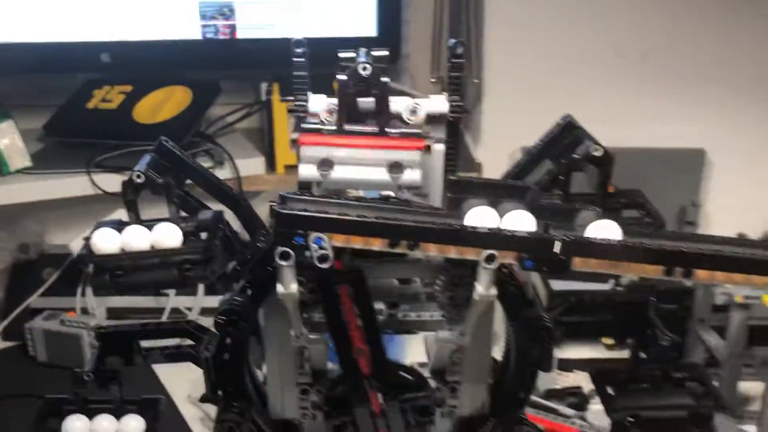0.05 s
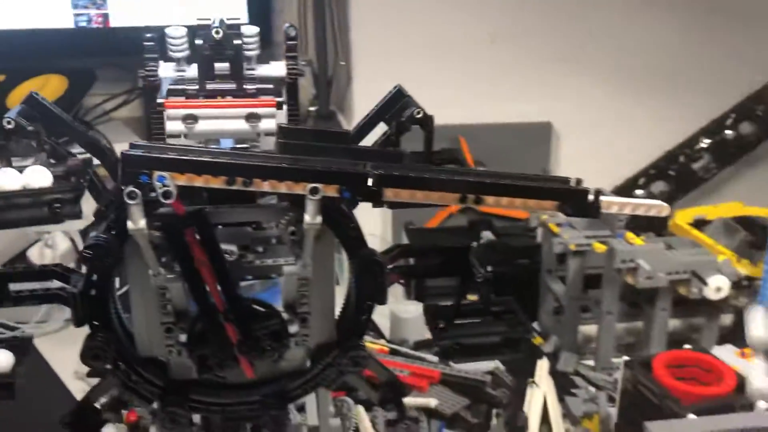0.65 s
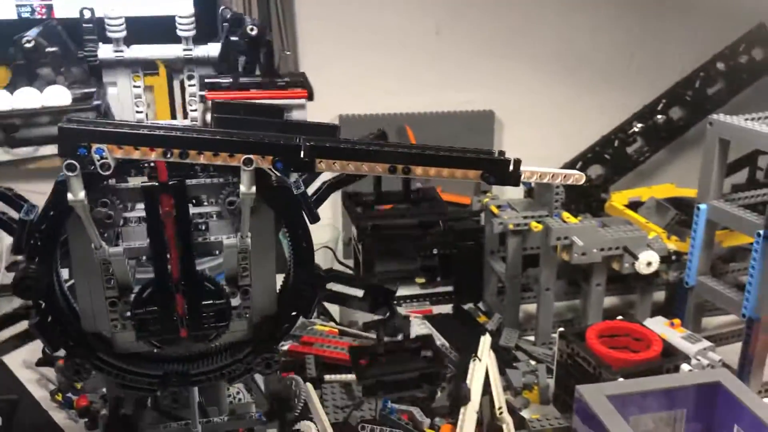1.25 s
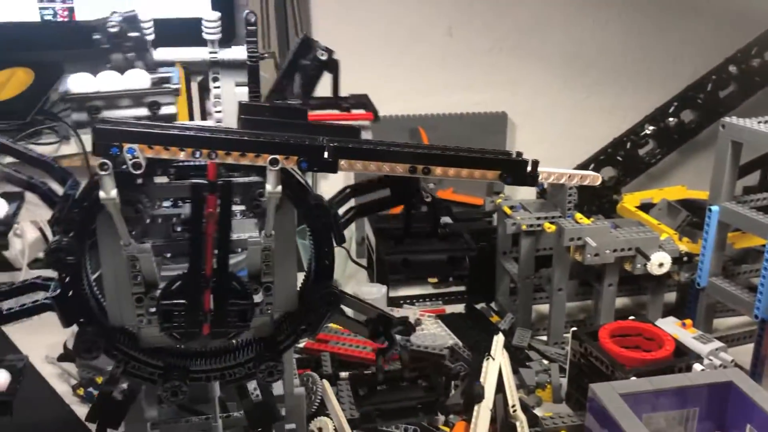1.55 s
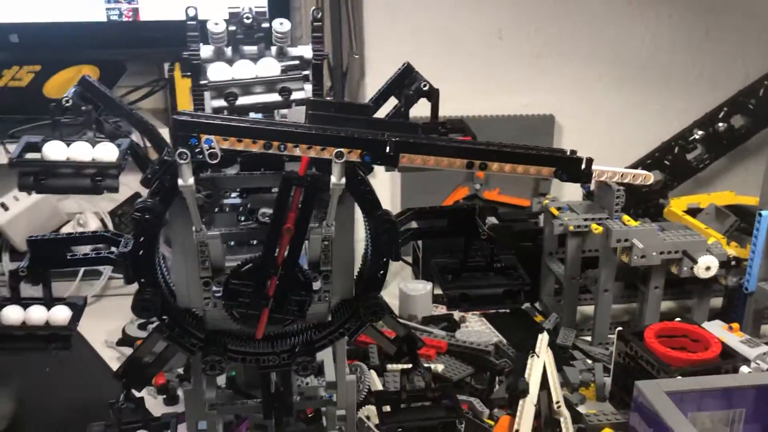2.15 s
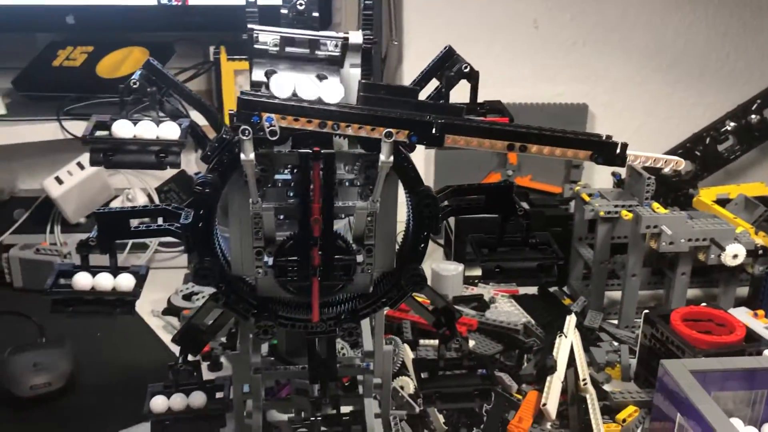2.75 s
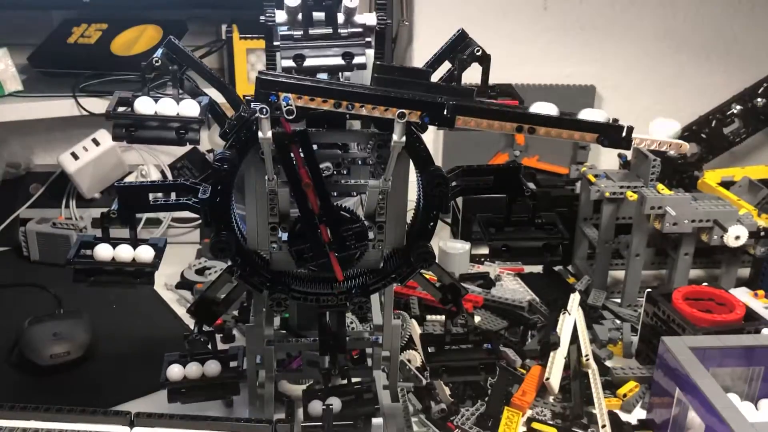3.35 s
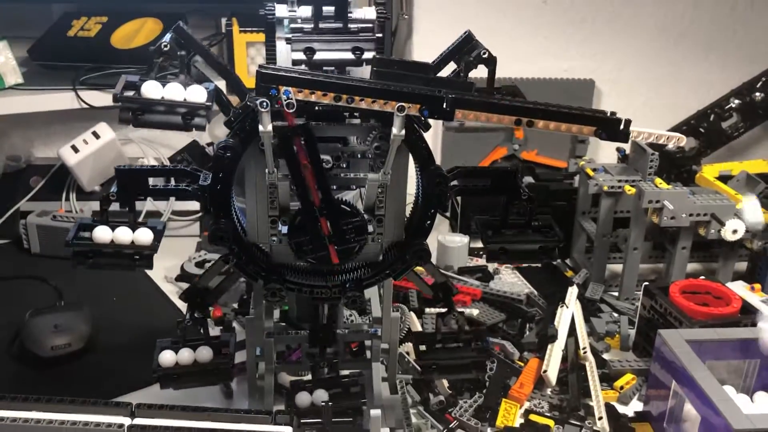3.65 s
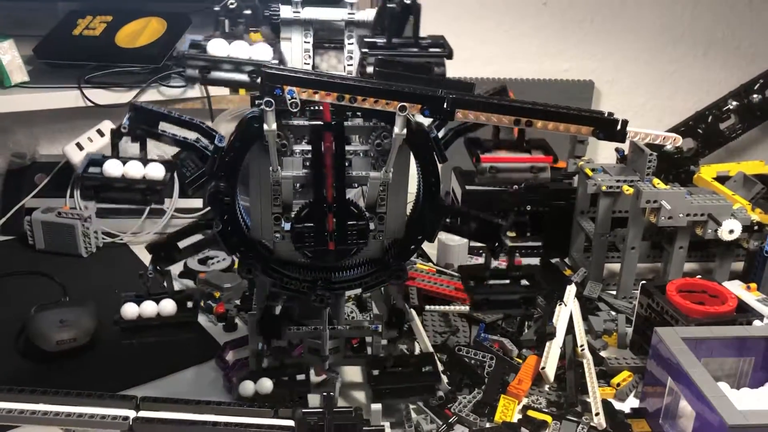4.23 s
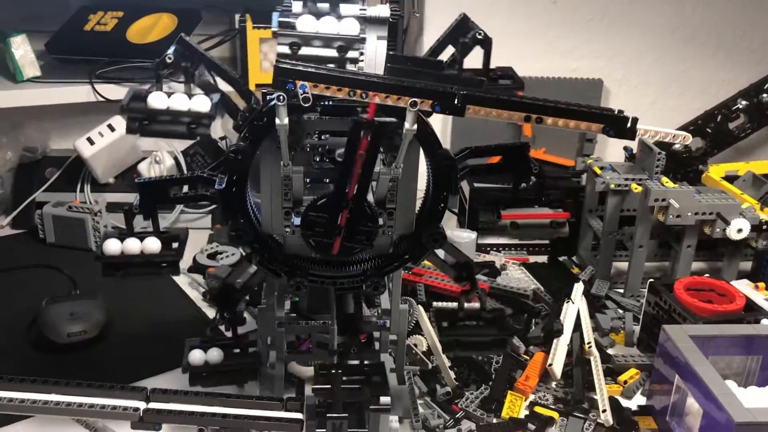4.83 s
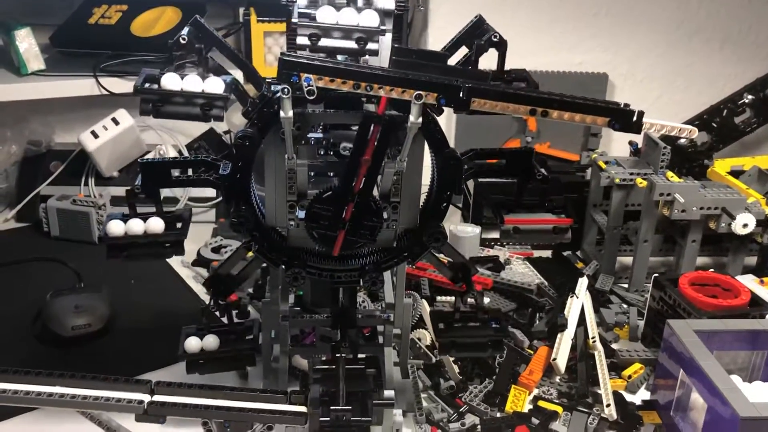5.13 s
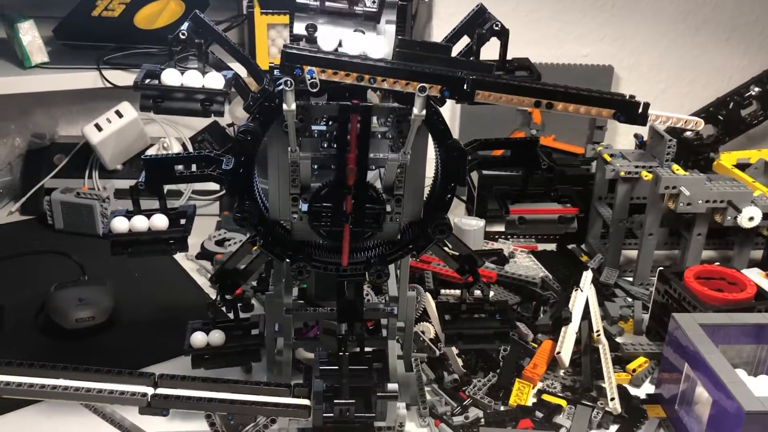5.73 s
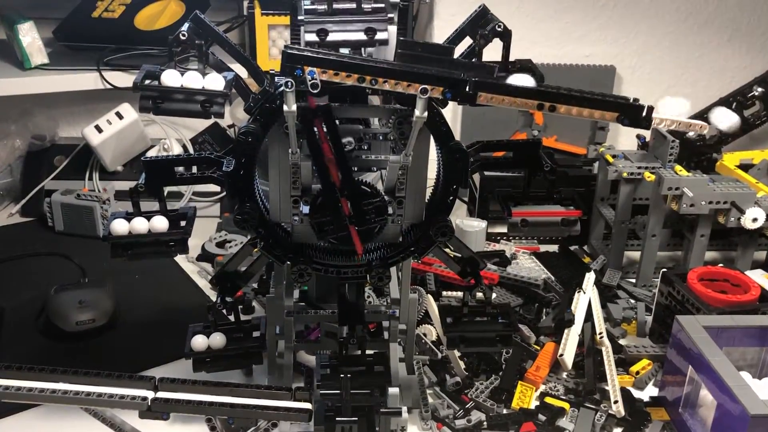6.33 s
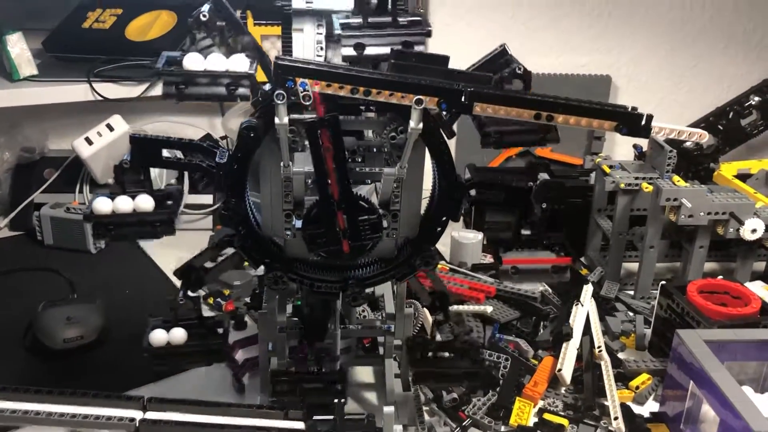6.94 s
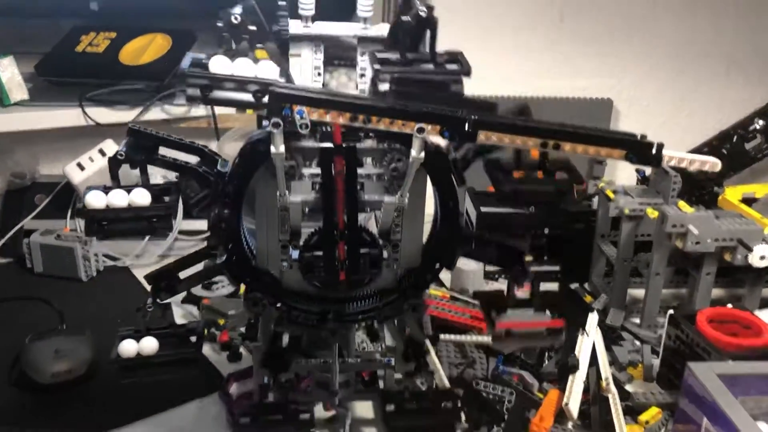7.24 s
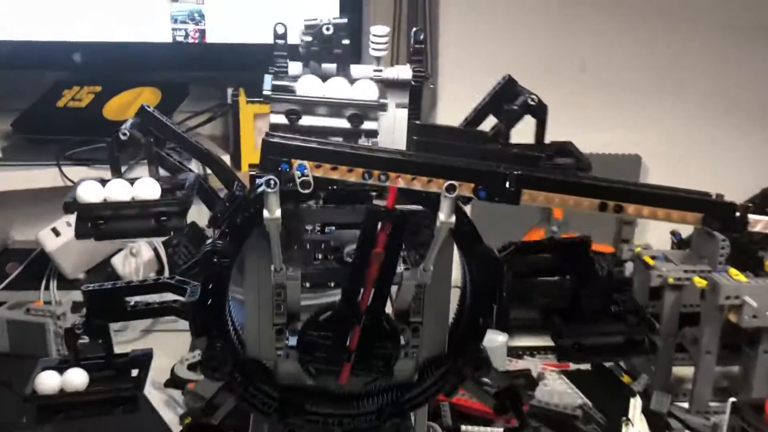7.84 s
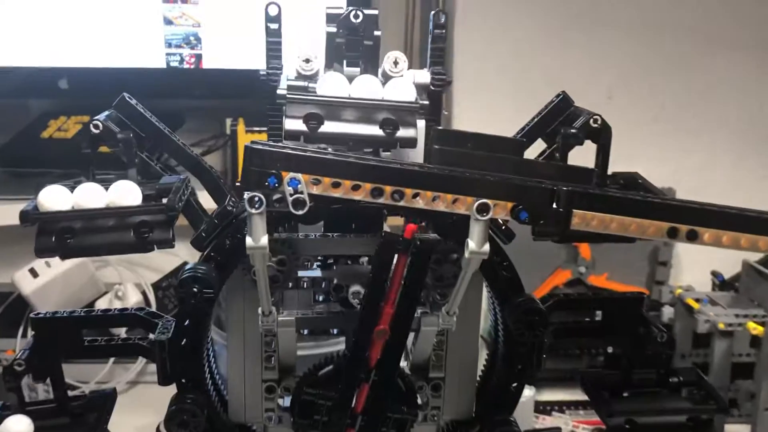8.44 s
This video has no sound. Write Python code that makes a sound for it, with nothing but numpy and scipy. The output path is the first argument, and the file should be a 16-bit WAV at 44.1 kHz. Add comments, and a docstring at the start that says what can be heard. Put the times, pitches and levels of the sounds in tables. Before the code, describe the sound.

Small motors whine and plastic gears whirr in a toy-brick ball machine, with balls clacking into a hollow hopper about every three seconds.

```python
"""A toy-brick ball machine runs on a humming desk in a small room. From the start two little motors
whine and plastic gears whirr, while balls trundle down a rail and a swinging arm bumps the frame.
At 0.7 s the balls fall into a hollow plastic hopper, exciting its modes with sharp clacks and hops.
The motors sag under the next scoopful; from 2.4 s the scoop clicks and tips it onto the rail, and
the frame gives one heavy thud. Rolling, clacks and clicks return about every three seconds."""
import sys
import numpy as np
from scipy import signal
from scipy.fft import rfft, irfft, next_fast_len
from scipy.io import wavfile

SR = 44100
rng = np.random.default_rng(int(sys.argv[2]) if len(sys.argv) > 2 else 0)


def waveform_to_disk(signal):
    """Save audio, clipped to [-1, 1], as 16-bit WAV at the path in sys.argv[1]."""
    frames = np.transpose(np.atleast_2d(signal))
    scaled = np.clip(frames, -1, 1) * 32767
    samples = np.round(scaled).astype(np.int16)
    wavfile.write(sys.argv[1], SR, samples)


N = 373968
TIME = np.arange(N) / SR
CYCLE_S = 2.995

# load on the motors, free as the balls roll, then lifting: (time in the cycle [s], load [0-1])
MOTOR_LOAD = [(0, .27), (.29, 0.01), (.62, 0.13), (1.2, .58), (1.97, 0.48), (2.11, 0.66), (2.2, 0.97),
              (2.33, .62), (2.75, .68)]
# drive motor lines, low, free-running and strained: (order [multiple of shaft rate], relative level [dB])
DRIVE_LINES = [(3, -9.5), (6, -7.5), (12, -11), (15, 0), (21, -11.5), (33, -14), (39, -24)]
SINGING_LINES = [(67, -5), (68, -2.5), (70, -11), (72, -20), (73, -4), (74, -3), (75, -5), (86, -17),
                 (87, -17), (88, -4.5), (89, -10), (103, -27)]
STRAIN_LINES = [(33, -11.5), (77, -6), (79, 0.5)]
# lines of a rough gear pair: (order [multiple of mesh rate], relative level [dB])
MESH_LINES = [(3, -11), (4, -1.5), (5, -0.5), (6, 3.5), (7, -1.5), (8, -3), (9, -14)]
# course of the gear whirr: (time [s], level [dB], share of the nearest gears [dB])
WHIRR_LEVELS = [(0, -47, -5), (.5, -48, -5), (1.4, -47, -13), (4.4, -47.5, -32), (7.4, -48, -12),
                (7.9, -49, -3), (8.48, -47.5, -3)]
# whirr of the whole train and of the nearest gears: (frequency [Hz], relative density [dB])
WHIRR_SPECTRUM = [(300, -41), (1100, -5), (1600, -15), (2200, -1), (3000, -10), (4100, -2), (5050, -4),
                  (5500, .5), (6200, 2.5), (6900, 1.5), (8300, 1), (9400, -5), (10000, -9), (11800, -10.5),
                  (13300, -8), (14300, -15), (16000, -24)]
NEAR_WHIRR_SPECTRUM = [(1500, -30), (2300, -14), (3200, -0.5), (4100, 3.5), (4700, -5), (5600, -35),
                       (7000, 5), (7800, -24), (9000, 1), (12000, -21)]
# detour of the desk reflection as the microphone moves: (time [s], extra path [m])
DESK_DETOUR = [(0, 0.22), (.6, .14), (2.6, .16), (3.2, .24), (7, 0.238), (8.48, 0.16)]
# course of the desk's low sounds: (time [s], hum level [dB], rumble level [dB])
DESK_LEVELS = [(0, -73, -56), (2.4, -80, -57.5), (3.5, -67, -54.5), (4.4, -64.5, -57.5), (4.9, -66, -57.5),
               (5.2, -57, -56), (5.5, -58, -56.5), (5.75, -69, -57), (6.35, -60.5, -58), (7.2, -67, -57.5),
               (7.65, -59.5, -58), (7.9, -71, -57)]
# low noise of room and desk: (frequency [Hz], relative density [dB])
RUMBLE_SPECTRUM = [(20, -14), (45, -9), (80, 0), (120, 0), (200, 0), (310, -2), (450, -7), (900, -7.5),
                   (1600, -11.5), (4000, -22.5)]
# the rail under rolling balls: (frequency [Hz], relative density [dB])
RAIL_SPECTRUM = [(80, -52), (200, -4.5), (330, 2.5), (500, -12), (1100, 3), (1600, -0.5), (3000, -11),
                 (6000, -24)]
# arms swinging over, twice a cycle: (time [s], level [dB])
ARM_BUMPS = [(.039, -55), (1.785, -55), (3.059, -59), (4.774, -62.5), (6.07, -55.5), (7.79, -62.5)]
# impacts of scoop, arms and balls, then of balls on the hopper:
# (time [s], relative level [dB], struck part's pitch [Hz], body re crack [dB], rattle T60 [s])
SCOOP_STRIKES = [(.251, -34, 1550, -14, 0.021), (1.817, -29.5, 1823, -14, 0.047),
                 (2.3982, -11, 3780, -2.5, 0.0016), (2.4005, -16, 2960, 3, 0.0085),
                 (2.4187, -39, 2100, -4, 0.022), (2.44, -23, 3700, -1, 0.0055),
                 (2.4575, -31, 2100, -2, .014), (2.5735, -30.5, 2930, -1, 0.021),
                 (2.7913, -17.5, 4070, 0.5, .01), (2.825, -16.5, 4290, -19, 0.031),
                 (2.8395, -17.5, 1650, -20, .032), (2.8745, -22, 4000, -14, 0.029),
                 (2.893, -19, 3270, -24, 0.03), (2.9014, -19.5, 1100, -16, 0.062),
                 (4.871, -37, 2400, -14, 0.013), (5.8185, -15.5, 4140, -7.5, 0.026),
                 (5.8215, -20, 1400, -9, 0.026), (5.8848, -21, 6000, -24, .025),
                 (5.894, -18, 1590, -22, 0.026), (5.904, -24.5, 970, -20, 0.069),
                 (5.9515, -28.5, 2200, -9, 0.024), (7.82, -36, 1922, -14, .019)]
HOPPER_STRIKES = [(.6987, 0, 2780, -9, .008), (.716, -4, 1300, -3, 0.058), (.777, -13, 1500, -1.5, 0.018),
                  (.8066, 0, 2160, -6, 0.012), (.812, -4.5, 1350, -3, 0.02), (.8305, 1.5, 4700, -12, 0.018),
                  (.8497, -4.5, 800, 3.5, 0.016), (.8798, -9, 3400, -18, 0.015),
                  (.9388, -14, 2920, -9, 0.0083), (.9772, -11, 1705, -5, 0.014),
                  (1.0528, -20, 2220, -3, 0.0056), (1.078, -19, 1860, -10, 0.029),
                  (3.6927, 0.5, 2200, -27, 0.0092), (3.6967, -4.5, 1920, -6, 0.016),
                  (3.7858, -1, 2410, -6.5, 0.0067), (3.794, -7.5, 1250, -6.5, 0.023),
                  (3.802, -6, 4300, -23, 0.01), (3.8525, -0.5, 7400, -5, 0.0098),
                  (3.861, -7, 1200, -7, 0.063), (6.6187, 0.5, 3350, -8, 0.013),
                  (6.6872, 0.5, 1430, -7.5, 0.0091), (6.733, -9.5, 900, -10, 0.031),
                  (6.7507, -10.5, 2920, -16, 0.006), (6.8188, -15, 1465, -8, 0.0089),
                  (6.8973, -0.5, 1510, -4.5, 0.0075), (6.9085, -2.5, 1300, -7, 0.038)]
# spectra of those contacts: (frequency [Hz], relative density [dB])
SCOOP_CONTACT = [(100, -18), (500, -11.5), (1000, -10.5), (1500, -11), (2300, -5), (3600, -3.5), (5500, -5),
                 (8000, -8), (11000, -7.5), (16000, -19)]
HOPPER_CONTACT = [(40, -22), (130, -8), (300, -10), (420, -8), (570, -19), (680, -2.5), (900, -1.5),
                  (1100, -3), (1300, 1.5), (1800, 1.5), (3000, 1.5), (3900, -4), (4300, -2), (5100, -5.5),
                  (8000, -9), (11000, -11), (16000, -25.5)]
# normal modes of the struck bodies: (frequency [Hz], relative level [dB], T60 [s])
SCOOP_MODES = [(1990, -11, 0.23), (2300, -13, 0.11), (2980, 4, 0.13), (3690, 6, 0.032), (4350, 5, 0.064),
               (5000, -12, .06), (6373, 2.5, 0.062), (7730, 7, 0.05)]
HOPPER_MODES = [(138.5, -22, 0.35), (214.4, -20.5, 0.21), (315.9, -15, 0.1), (344.6, -9.5, 0.11),
                (620, -5, 0.065), (715, -5, 0.078), (815, -2.5, 0.12), (880, -2.5, 0.11), (920, -7.5, 0.29),
                (974, -3, 0.097), (1166, -9.5, 0.1), (1268, 2.5, 0.078), (1348, 4.5, 0.06),
                (1475, -5, 0.14), (1547, -4.5, 0.12), (1778, -7, 0.25), (1935, -2, 0.11), (2180, -5, 0.061),
                (2620, -21, .06)]
# reverberation time of the room: (frequency [Hz], T60 [s])
ROOM_DECAY = [(120, 0.23), (500, 0.12), (1500, 0.186), (3000, 0.3338), (6000, 0.19), (10000, 0.19),
              (16000, 0.12)]
# colour of the reverberation: (frequency [Hz], relative level [dB])
ROOM_SPECTRUM = [(100, 1.5), (400, 7), (1200, 5), (3000, -4.5), (7000, 0), (15000, -4)]
# thud of the frame: (frequency [Hz], relative density [dB])
THUD_SPECTRUM = [(90, -30), (125, 5), (165, -10), (230, 4), (330, -4), (480, -15), (900, -35), (3000, -60)]


def amp(db):
    """Decibels to amplitude ratio."""
    return 10 ** (np.asarray(db) / 20)


def unit_rms(x):
    """Normalises to rms 1."""
    return x / np.sqrt(np.mean(x ** 2) + 1e-20)


def unit_energy(x):
    """Normalises to energy 1."""
    return x / (np.linalg.norm(x) + 1e-20)


def value_at(points, hz):
    """Interpolates on a log-frequency axis."""
    f, value = np.transpose(points)
    return np.interp(np.log(hz + 1), np.log(f), value)


def curves(rows):
    """Interpolates each column of a time table at every sample."""
    s, *columns = np.transpose(rows)
    return [np.interp(TIME, s, c) for c in columns]


def add(mix, s, sound):
    """Superposes a sound at time s."""
    part = mix[max(round(s * SR), 0):][:len(sound)]
    part += sound[:len(part)]


def fade(t, t60):
    """Exponential decay, 60 dB in t60 seconds."""
    return np.exp(-np.log(1000) * t / np.maximum(t60, 1e-3))


def coloured(x, spectrum):
    """Filters x by a spectrum, to rms 1."""
    size = next_fast_len(len(x))
    gain = amp(value_at(spectrum, np.fft.rfftfreq(size, 1 / SR)))
    return unit_rms(irfft(rfft(x, size) * gain, size)[:len(x)])


def wander(rate_hz, size=8192):
    """Random fluctuation of rms about 1."""
    return np.interp(TIME * rate_hz, np.arange(size), rng.standard_normal(size))


def harmonics(turns, db, lines, flutter_db, flutter_hz, blur):
    """Harmonics of a rotation; play between the teeth modulates their amplitude and phase."""
    out = np.zeros(N)
    for order, line_db in lines:
        phase = 2 * np.pi * order * (turns + blur * wander(flutter_hz))
        out += amp(line_db + flutter_db * wander(flutter_hz)) * np.cos(phase)
    return np.sqrt(2) * amp(db) * out


def drive_motor(shaft, load):
    """Periodic forces radiate shaft harmonics: some sing when running free, others grow with load."""
    low_db = -60.5 + (-6.5 + 4 * wander(7.6)) * load
    low = harmonics(shaft, low_db, DRIVE_LINES, flutter_db=3, flutter_hz=45.7, blur=0.005)
    # the motor sits by the nearest gears and grows with them as the microphone nears
    nearness = 1 + 0.27 * amp(curves(WHIRR_LEVELS)[1])
    singing = harmonics(shaft, -61 - 12 * load, SINGING_LINES, flutter_db=5.5, flutter_hz=11, blur=0.0018)
    strain = harmonics(shaft, -76 + 12 * load, STRAIN_LINES, flutter_db=6, flutter_hz=29, blur=0.0017)
    return nearness * low + singing + strain


def second_motor(load, free_hz=2163, sag_hz=65.8):
    """A single tooth-mesh tone, which load makes lower and louder."""
    cycles = np.cumsum(free_hz - sag_hz * load) / SR
    return harmonics(cycles, -66 + 8.5 * load, [(1, 0)], flutter_db=4, flutter_hz=110.2, blur=0.15)


def rough_gears(load, free_hz=1069.5, sag_hz=43.35):
    """Periodic tooth contact gives harmonics of the mesh rate, grinding louder under load."""
    teeth = np.cumsum((free_hz - sag_hz * load) * (1 + 0.001975 * wander(40))) / SR
    return harmonics(teeth, -64 + 5 * load, MESH_LINES, flutter_db=4.5, flutter_hz=95.2, blur=0.046)


def desk_reflections(x, desk_gain=0.029, clutter_gain=0.09, count=7):
    """Interference with echoes off desk and clutter: a comb filter that slides as the microphone moves."""
    lag_s = curves(DESK_DETOUR)[0] / 343
    out = x + desk_gain * np.interp(TIME - lag_s, TIME, x)
    for further_s, side in zip(np.geomspace(.001, .012, count), rng.uniform(-0.92, 1, count)):
        out += clutter_gain * np.interp(TIME - further_s - side * lag_s, TIME, x)
    return unit_rms(out)


def gear_whirr(shaft, shaft_depth=0.029, pole_depth=0.13, flicker_db=0.95, ticks_per_s=450):
    """Friction noise and ticks of the teeth, amplitude-modulated by the shaft and three motor poles."""
    db, near_db = curves(WHIRR_LEVELS)
    slide, near_slide = rng.standard_normal((2, N))
    ticks = amp(-7) * unit_rms(rng.standard_normal(N) * (rng.random(N) < ticks_per_s / SR))
    throb = 1 + shaft_depth * np.cos(2 * np.pi * shaft) + pole_depth * np.cos(6 * np.pi * shaft)
    train = coloured((slide + ticks) * throb, WHIRR_SPECTRUM)
    nearest = amp(near_db) * coloured(near_slide * throb, NEAR_WHIRR_SPECTRUM)
    return amp(db + flicker_db * wander(70)) * desk_reflections(train + nearest)


def machine(free_mesh_hz=1823, sag_hz=53.4, pinion_teeth=15):
    """A cyclic, slightly uneven load torque slows both motors and the gears in step."""
    load = np.interp(TIME, *np.transpose(MOTOR_LOAD), period=CYCLE_S) * (1 + 0.099 * wander(9))
    shaft_hz = (free_mesh_hz - sag_hz * load) / pinion_teeth * (1 + 0.00098 * wander(25))
    shaft = np.cumsum(shaft_hz) / SR
    return drive_motor(shaft, load) + second_motor(load) + rough_gears(load) + gear_whirr(shaft)


def desk(hum_hz=88):
    """The vibrating desk top radiates a wavering hum over low room noise."""
    hum_db, rumble_db = curves(DESK_LEVELS)
    hum_gain = np.sqrt(2) * amp(hum_db + 1.096 * wander(19))
    hum = hum_gain * np.sin(2 * np.pi * np.cumsum(hum_hz + 1.4 * wander(12)) / SR)
    return hum + amp(rumble_db + 1.43 * wander(6.2)) * coloured(rng.standard_normal(N), RUMBLE_SPECTRUM)


def rolling(lead_s=0.13, length_s=0.75, db=-59, lump_db=3):
    """Rolling contact: once a cycle, balls crossing its joints excite the rail with lumpy noise."""
    along = (TIME + lead_s) % CYCLE_S / length_s
    arch = np.sqrt(np.maximum(1 - (2 * along - 1) ** 2, 0))
    return arch * amp(db + lump_db * wander(35)) * coloured(rng.standard_normal(N), RAIL_SPECTRUM)


def arm_bumps(boom_hz=317.8, length_s=.12, waver=0.095, blur_hz=260):
    """An arm swings over and the frame booms; random modulation broadens the tone into a band."""
    out, t = np.zeros(N), np.arange(int(length_s * SR)) / SR
    swell = np.sin(np.pi * t / length_s) ** 2
    for s, db in ARM_BUMPS:
        hz = boom_hz * (1 + waver * wander(blur_hz)[:len(t)])
        boom = np.sin(2 * np.pi * np.cumsum(hz) / SR)
        judder = 1 + .5 * wander(blur_hz)[:len(t)]
        add(out, s, amp(db) * unit_rms(judder * boom * swell))
    return out


def room_response(early_db=-2, early_t60=0.029, onset_s=0.0089, size=24576):
    """Reverberation: early reflections off desk and wall, then a tail with frequency-dependent decay."""
    hz, t, noise = signal.stft(rng.standard_normal(size), SR, nperseg=256)
    decay = fade(t, value_at(ROOM_DECAY, hz)[:, None]) + amp(early_db) * fade(t, early_t60)
    colour = amp(value_at(ROOM_SPECTRUM, hz))[:, None]
    tail = signal.istft(noise * colour * decay, SR, nperseg=256)[1][:size]
    onset = 1 - np.exp(-(np.arange(size) / SR / onset_s) ** 2)
    return unit_energy(tail * onset)


def impacts(strikes, contact, modes, tilt_db, tilt_per_db, part_db, part_octaves,
            rattle_db, spread_s, detune, room_db, size=8192):
    """Impulse excitation of plastic: a crack, a rattle of loose bricks, the body's modes, the room."""
    out, t, hz = np.zeros(N), np.arange(size) / SR, np.fft.rfftfreq(size, 1 / SR)
    mode_hz, mode_db, mode_t60 = np.transpose(modes)[:, :, None]
    decays = amp(mode_db) * fade(t, mode_t60)
    octaves = np.log2(np.maximum(hz, 800) / 3000)
    taper = np.clip(2 - 4 * t / t[-1], 0, 1)
    # dispersion: bending waves carry the treble first, so each crack is a tiny falling chirp
    chirp = np.exp(-4j * np.pi * spread_s * np.sqrt(hz * 3000))
    for s, db, part_hz, body_db, rattle_t60 in strikes:
        # a stronger blow makes a shorter, brighter contact
        brightness_db = (tilt_db + tilt_per_db * db) * octaves
        # a long rattle builds up gradually and outweighs the first contact
        swell = fade(t, rattle_t60) - fade(t, rattle_t60 / 4)
        rattle = amp(rattle_db) * rattle_t60 / 0.0092 * unit_energy(rng.standard_normal(size) * swell)
        # the struck part has one broad, well damped resonance
        resonance_db = part_db / (1 + (np.log2((hz + 1) / part_hz) / part_octaves) ** 2)
        colour = amp(value_at(contact, hz) + brightness_db + resonance_db)
        crack = taper * unit_energy(irfft((1 + rfft(rattle)) * chirp * colour))
        # each spot that is struck rings the body a little differently
        shift, polarity = rng.standard_normal((2, len(modes), 1))
        rings = np.sign(polarity) * decays * np.cos(2 * np.pi * mode_hz * (1 + detune * shift) * t)
        blow = amp(db) * (crack + amp(body_db) * unit_energy(rings.sum(0)))
        add(out, s, blow)
        add(out, s, amp(room_db) * signal.fftconvolve(blow, room_response()))
    return out


def scoop_clicks():
    """Light impacts of scoop, arms and balls excite the scoop's high modes."""
    return impacts(SCOOP_STRIKES, SCOOP_CONTACT, SCOOP_MODES, tilt_db=2.5, tilt_per_db=0.11, part_db=12,
                   part_octaves=0.25, rattle_db=4, spread_s=0.000301, detune=0.012, room_db=-8)


def with_hops(strikes, hard_db=-5, hop_s=.075, restitution=.7, first_db=-20, step_db=-5, count=3):
    """Inelastic rebound: a hard strike is followed by ever weaker hops, on average ever shorter."""
    hops, chances = [], rng.uniform(-1, 1, (len(strikes), count, 2))
    for (s, db, hz, body_db, rattle_t60), chance in zip(strikes, chances):
        if db > hard_db:
            for k, (late, higher) in enumerate(chance):
                s += hop_s * restitution ** k * (1 + late / 2)
                hops.append((s, db + first_db + k * step_db, hz * 2 ** (higher / 2), body_db, rattle_t60))
    return list(strikes) + hops


def hopper_clacks():
    """Falling balls strike and rebound, exciting the lower modes of the hollow hopper."""
    strikes = with_hops(HOPPER_STRIKES)
    return impacts(strikes, HOPPER_CONTACT, HOPPER_MODES, tilt_db=0.8, tilt_per_db=0.2, part_db=4,
                   part_octaves=0.22, rattle_db=3.5, spread_s=0.0007034, detune=.01, room_db=-7)


def frame_thud(at_s=3.085, db=-37.5, rise_s=0.026, t60=0.3):
    """Damped vibration of the frame after one soft, heavy knock: low noise with no clear pitch."""
    t = np.maximum(TIME - at_s, 0)
    envelope = np.minimum(t / rise_s, 1) * fade(t, t60)
    return amp(db) * envelope * coloured(rng.standard_normal(N), THUD_SPECTRUM)


def scene():
    """Superposition of all the sources, heard from close by in one channel."""
    running = machine() + desk() + rolling() + arm_bumps()
    return (running + amp(11) * scoop_clicks() + amp(12) * hopper_clacks() + frame_thud())[None]


def record(dry, low_cut_hz=60, high_cut_hz=16100):
    """Saturation in the microphone rounds the loudest cracks; filters then limit the band."""
    rounded = dry / (1 + dry ** 4) ** (1 / 4)
    thin = signal.sosfilt(signal.butter(2, low_cut_hz, "highpass", fs=SR, output="sos"), rounded)
    lowpass = signal.firwin(255, high_cut_hz, window=("kaiser", 9), fs=SR)
    return signal.oaconvolve(thin, lowpass[None], "same")


dry = scene()
out = record(dry)
waveform_to_disk(out)
```